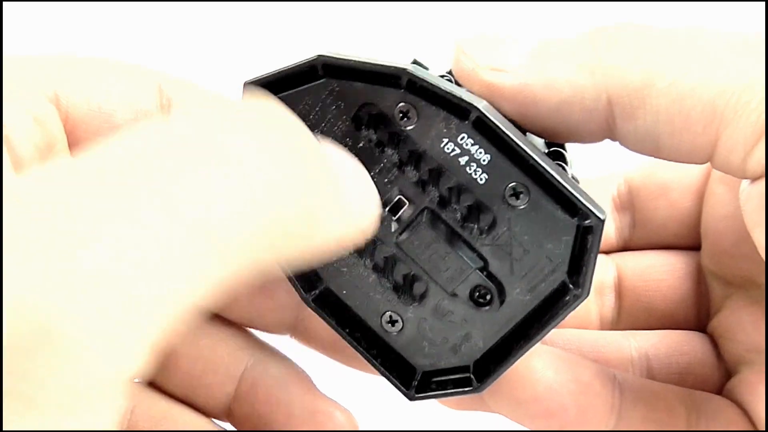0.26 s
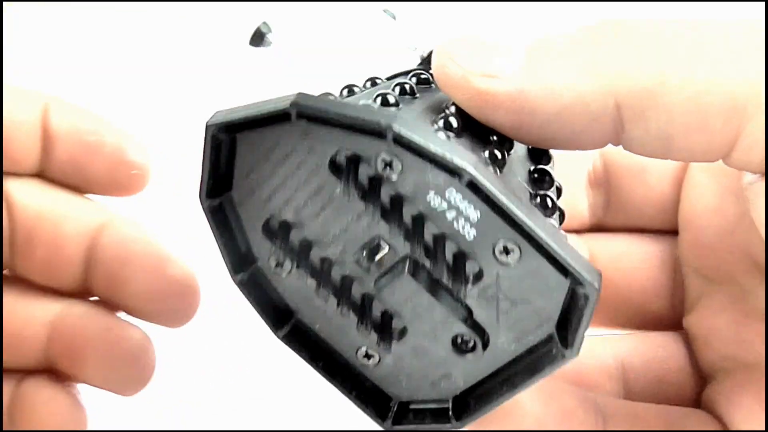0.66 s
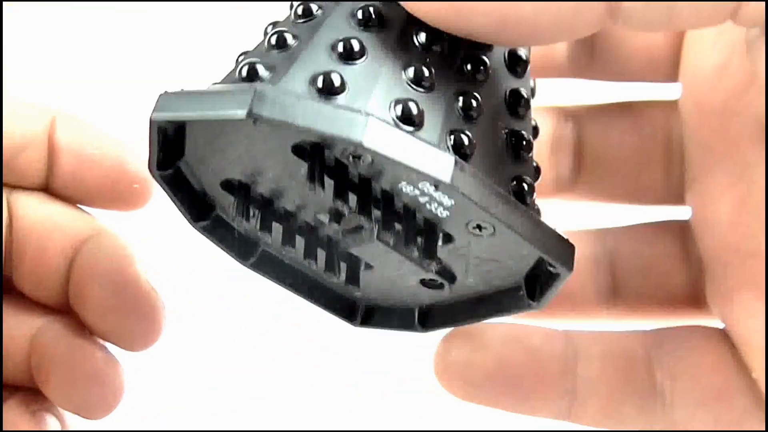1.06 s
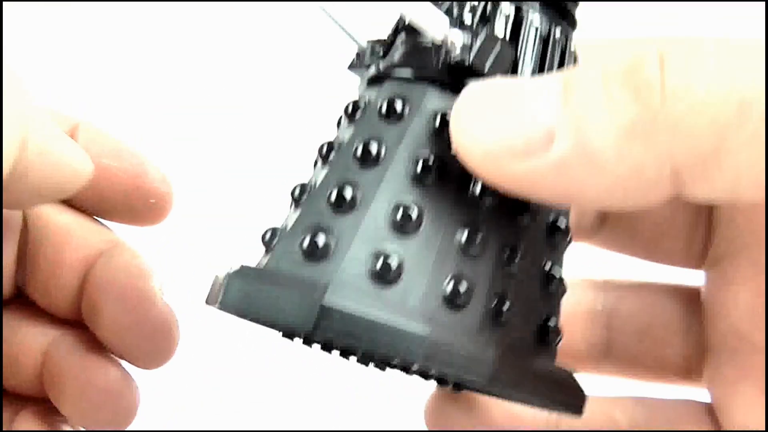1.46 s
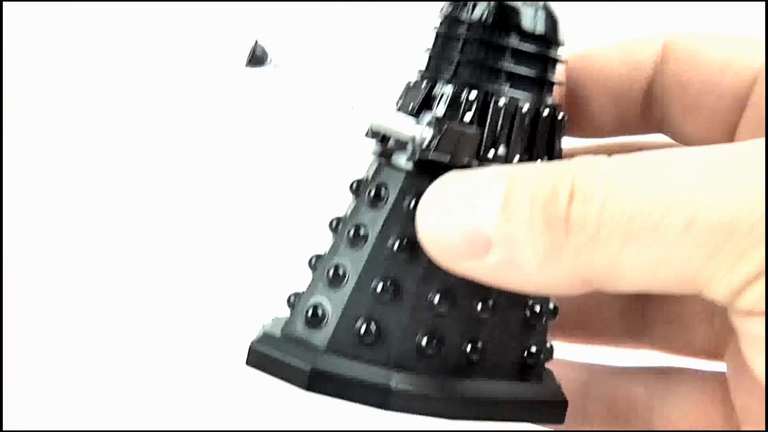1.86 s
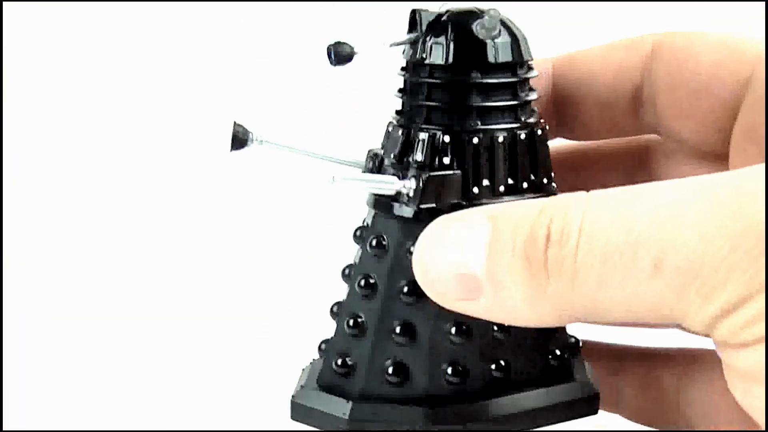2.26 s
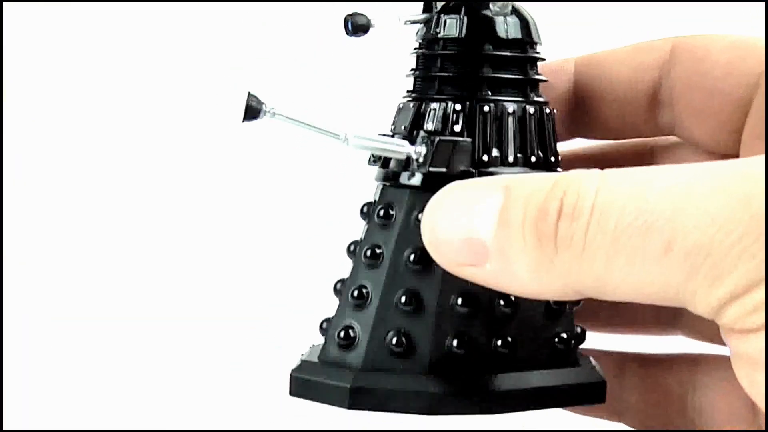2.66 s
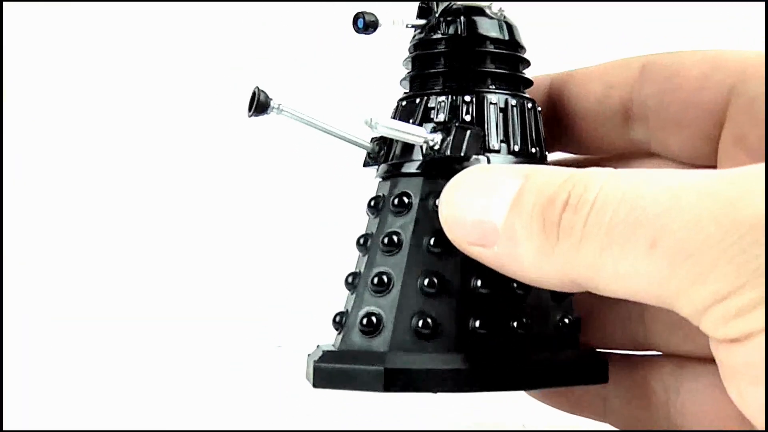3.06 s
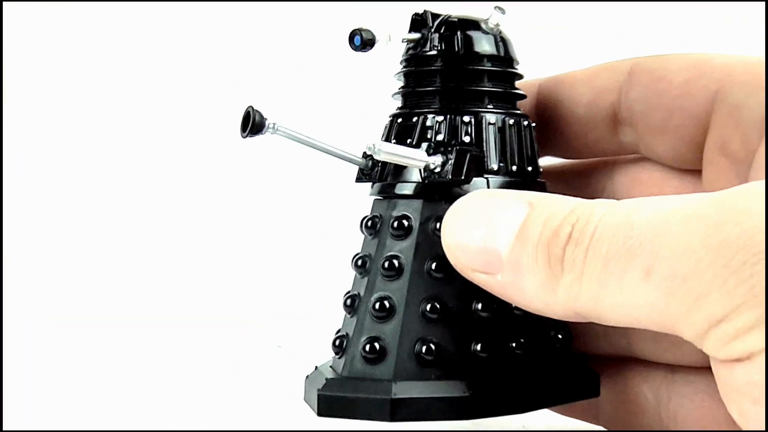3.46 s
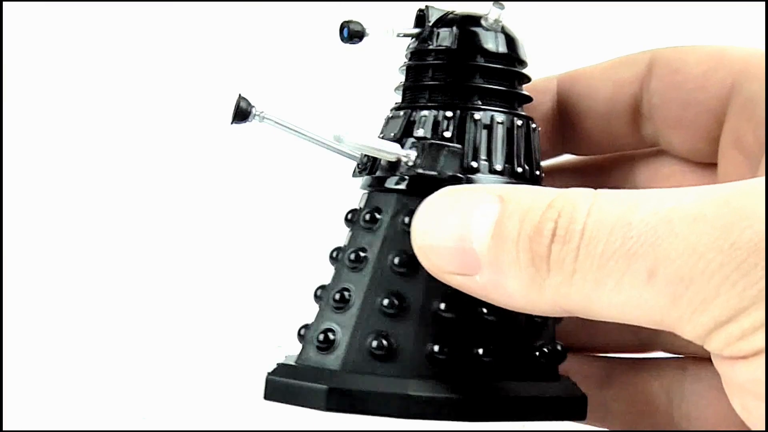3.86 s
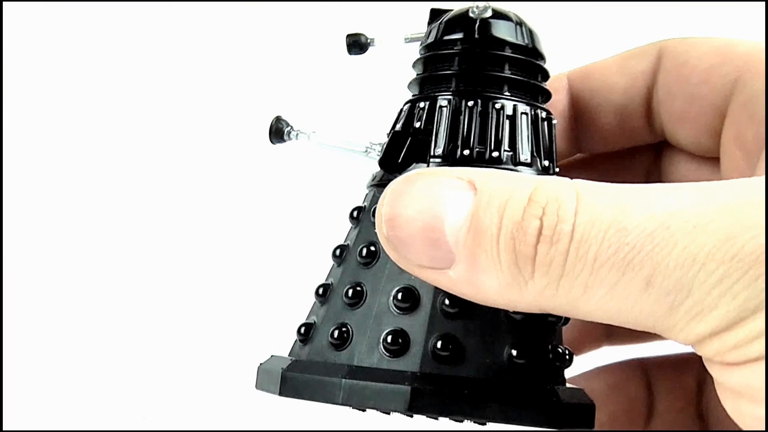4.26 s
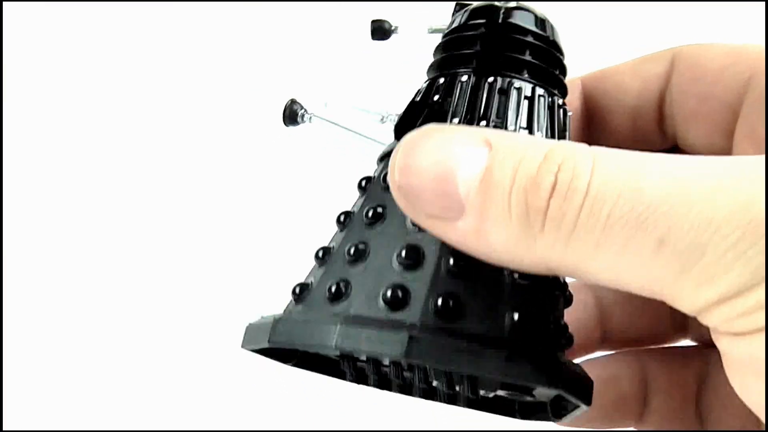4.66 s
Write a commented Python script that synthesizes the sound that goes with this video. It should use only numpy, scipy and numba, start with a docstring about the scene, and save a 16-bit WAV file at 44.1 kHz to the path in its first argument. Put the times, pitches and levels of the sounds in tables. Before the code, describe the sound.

Close to the microphone in a quiet room, the switch of a small hollow plastic toy snaps on. Its vibration motor spins up at once into a steady hum with a thin, high rattling buzz. Fingers knock and rub on the shell as the toy is turned over. The motor keeps running, its rattle shifting with the grip, under a few more soft knocks.

```python
"""In a quiet room the slide switch of a small hollow plastic bristle toy snaps, close to the microphone.
The motor spins up, and its off-centre weight drives the toy into forced vibration: it hums, and
loose parts strike a few times on every turn, exciting resonances of the shell and the motor's metal.
The toy is then turned over in the hand. Fingers rub and knock on the shell and damp its ringing;
the rubbing ends, and the motor runs on under a few more knocks."""
import sys
import numpy as np
from scipy import signal
from scipy.fft import rfft, irfft
from scipy.io import wavfile
from scipy.ndimage import uniform_filter1d
from numba import njit

SR = 44100
rng = np.random.default_rng(int(sys.argv[2]) if len(sys.argv) > 2 else 0)


def transcribe(u):
    """Save the signal u as a 16-bit wav file named by the first command-line argument.

    u: samples, shape (n,) or (channels, n), limited to [-1, 1]; the rate is SR.
    q: integer samples, one column per channel.
    """
    v = np.clip(np.atleast_2d(u).T, -1, 1)
    q = np.round(v * 32767).astype(np.int16)
    wavfile.write(sys.argv[1], SR, q)


N = 212032

# Noise spectra. Each row: frequency in Hz, relative spectral density in dB.
ROOM_SPECTRUM = [(25, 2), (60, -22), (100, -1), (200, -3.5), (430, 0.5), (600, -3), (900, -5), (1200, -9),
                 (2100, -16.5), (2600, -19), (14000, -24), (16000, -64)]
RUB_SPECTRUM = [(60, -70), (120, 0.5), (300, 0), (550, -0.5), (800, -7), (1300, -58), (3000, -54)]
SWISH_SPECTRUM = [(300, -7), (700, 4.5), (1500, 1.5), (2200, -3), (3200, -16.5), (6000, -12), (16000, -47)]
SKIN_HISS_SPECTRUM = [(1500, -9), (3200, -5.5), (5000, 7.5), (9000, -4), (12000, -12), (16000, -24)]
MOTOR_HISS_SPECTRUM = [(40, -19), (100, 8), (260, -1.5), (450, 0.5), (850, -15.5), (1700, -9), (3400, -7),
                       (5000, -2.5), (7000, -6.5), (10000, -16.5), (15000, -7)]

# Finger strokes. Each row: start and length in seconds, relative levels of rub and swish in dB.
STROKES = [(0.845, 0.11, -43, -56.5), (0.974, 0.11, -45, -54), (1.129, 0.11, -47, -59.5),
           (1.463, 0.042, -45, -66), (1.516, 0.075, -44, -59.5), (1.679, .11, -59, -58),
           (1.781, 0.063, -50, -59.5), (2.208, 0.082, -56.5, -60)]
# Finger knocks. Each row: start in seconds, peak level in dB before the room, body pitch in Hz.
KNOCKS = [(0.8343, -15.5, 293), (1.068, -30, 111), (1.085, -34, 99), (1.106, -33, 110), (1.978, -28.5, 196),
          (2.0, -34.5, 200), (2.04, -34.5, 183), (2.66, -34, 163), (2.692, -35.5, 138), (2.717, -37.5, 150),
          (2.776, -38, 150), (2.815, -35.5, 159), (2.858, -32.5, 165), (2.914, -36, 148),
          (2.978, -36.5, 158), (3.052, -32.5, 155), (3.2334, -25, 152), (4.7923, -17.5, 147)]
# The switch snaps over and rebounds. Each row: start in seconds, relative level in dB.
SWITCH_SNAPS = [(0.1531, -17), (0.1565, -0.5), (0.157, 6), (0.1613, -20), (0.1623, -14)]
# Modes it excites. Each row: frequency in Hz, relative level in dB, time to fall 60 dB in seconds.
SWITCH_MODES = [(225, -40, .03), (400, -16, 0.0076), (720, -27.5, 0.01), (1280, -39, 0.0066),
                (1717, -34, 0.024), (2270, -36, 0.0093), (3240, -36, .008), (4070, -26, 0.018),
                (4960, -21.5, 0.018), (5460, -23.5, 0.016), (5980, -22, 0.022), (7260, -25, 0.02),
                (7870, -33, .025), (8520, -29, 0.035), (11000, -19, 0.0039), (13700, -36, 0.0038)]

# Running speed, which sags under a firmer grip. Each row: time in seconds, turns per second once spun up.
RUNNING_SPEED = [(.42, 173.7), (.54, 177.6), (.7, 178.3), (.95, 176.6), (1.55, 175.8), (1.65, 174.8),
                 (1.9, 174.4), (2.25, 175.3), (2.55, 175.4), (2.82, 176.4), (3.02, 174.6), (3.3, 172.9),
                 (3.73, 172.1), (4.18, 175.1), (4.42, 173.4), (4.81, 172.6)]
# How the toy is held. Each row: time in seconds, contact scrape from 0 to 1, gain of the buzz in dB.
GRIP = [(0.17, .95, -8), (0.42, 0, -1), (0.56, .05, -8), (0.8, 0, -4), (1.1, 0.52, -5.5), (1.6, 0.37, -0.5),
        (2.1, 0.38, 5), (3.9, 0.12, 4), (4.15, 0.3, -1), (4.81, 0.1, -1.5)]
# Swing of the whole toy. Each row: time in seconds, level of the hum in dB.
HUM_LEVEL = [(0.17, -55), (0.21, -47), (0.28, -48.5), (0.33, -42.5), (0.5, -40), (0.9, -38), (1.15, -37.5),
             (1.6, -38.5), (2.1, -40), (2.4, -41), (3.1, -41.5), (3.5, -40), (4.81, -40.5)]
# Partials of the hum and of the frame's buzz. Each row: multiple of the speed, relative level in dB.
HUM_PARTIALS = [(1, 0), (2, -36), (3, -26.5), (4, -32.5), (5, -38.5)]
BUZZ_PARTIALS = [(6, -32), (7, -28.5), (8, -30.5), (9, -33), (10, -31.5), (11, -43), (12, -40), (13, -47),
                 (14, -36.5), (16, -32), (17, -26.5), (18, -38.5), (19, -38.5), (20, -34), (21, -44),
                 (22, -37), (23, -44), (24, -46), (25, -37.5), (26, -38)]
# The motor's whine and a faint, high metal ring. Each row: time in seconds, level in dB.
WHINE_LEVEL = [(0.19, -72), (0.38, -78), (0.41, -69), (0.67, -62.5), (1.27, -59.5), (1.33, -68.5),
               (1.95, -56.5), (2.01, -67), (2.1, -59.5), (2.3, -67), (3.02, -62), (3.07, -58.5),
               (4.72, -60.5), (4.76, -59)]
FAINT_RING_LEVEL = [(0.19, -62), (0.24, -53), (0.39, -64), (0.51, -54.5), (1.08, -55), (1.26, -65),
                    (1.49, -59), (1.91, -63), (1.95, -57), (2.9, -53.5), (3.19, -69), (3.78, -62),
                    (4.1, -54.5), (4.49, -63), (4.76, -62)]

# Impacts within one turn. Each row: position as a fraction of the turn, relative force in dB.
RATTLE_CONTACTS = [(0.222, -5.5), (0.442, -1.5), (0.626, -8.5), (0.858, -1)]
ZING_CONTACTS = [(0.11, -3.5), (0.268, -5), (0.602, -1.5)]
# Resonances. Each row: frequency in Hz, bandwidth in Hz, gain in dB.
TRIM_MODES = [(8100, 1240, -2.5), (8520, 120, 10), (9470, 1600, -3), (12200, 690, -6), (16000, 2700, -5.5)]
BASE_MODES = [(2880, 450, -9.5), (3710, 180, 1.5), (3720, 226, -2), (4500, 370, -4)]
ZING_MODES = [(13500, 320, -1), (13960, 260, 0), (14380, 380, -6)]
FAINT_RING_MODES = [(11230, 150, 0), (11420, 170, -2)]
SHELL_MODE_GROUPS = [
    [(5160, 107, -4), (5434, 140, 0), (5604, 167, -3)],
    [(5957, 99, -5.5), (6120, 140, -6), (6196, 100, -10)],
    [(6387, 164, 4.5), (6662, 160, -0.5), (7050, 98, -0.5)],
]  # three lists of such rows: low, middle and high
# The fingers damp each group differently. Each row: time in seconds, relative level in dB.
LOW_RING_LEVEL = [(0.19, -64), (0.29, -52), (0.88, -59), (1.11, -45.5), (1.37, -44.5), (1.54, -52),
                  (1.98, -48.5), (2.39, -57.5), (2.91, -51), (3.8, -54.5), (4.14, -43), (4.81, -44)]
MIDDLE_RING_LEVEL = [(0.19, -46), (0.32, -40), (0.52, -48), (0.72, -40), (0.81, -44.5), (1.13, -48),
                     (1.41, -42), (1.95, -46), (2.36, -59), (2.7, -54), (2.82, -47), (3.49, -57),
                     (3.66, -51.5), (3.96, -58), (4.1, -46), (4.81, -47.5)]
HIGH_RING_LEVEL = [(0.19, -52), (0.25, -45.5), (1.0, -48), (1.47, -44), (2.13, -59.5), (2.22, -53.5),
                   (2.84, -59.5), (2.89, -53.5), (3.78, -49), (4.01, -55.5), (4.32, -49.5), (4.81, -49.5)]
# Thin zing of the motor's metal. Each row: time in seconds, relative level in dB, centre in Hz.
ZING_CURVE = [(0.18, -51, 14100), (0.45, -37.5, 13900), (0.5, -50, 14100), (0.66, -41.5, 14300),
              (0.84, -50, 13600), (1.05, -45, 13700), (1.15, -50.5, 13500), (1.29, -42, 14300),
              (1.74, -48, 14100), (1.99, -40, 13400), (2.39, -44, 13900), (2.68, -43.5, 14100),
              (3.02, -48, 14100), (3.51, -41.5, 13400), (3.62, -44.5, 13500), (3.96, -41, 13500),
              (4.29, -46, 14200), (4.76, -42, 13950)]
# The turning toy beams the zing to one side. Each row: time in seconds, left minus right in dB.
ZING_SIDE = [(0.19, 4.0), (0.39, 4.0), (0.9, -1), (1.0, 4.5), (1.82, 1.5), (2.81, 3.0), (3.08, -1),
             (3.21, 1.5), (4.81, 4)]
# Loose parts shake most while the toy is turned over.
# Each row: time in seconds, relative levels of the trim's sizzle and the base's rasp in dB.
LOOSENESS = [(0.19, -51.5, -53.5), (0.35, -53, -75.5), (0.41, -54, -60), (0.52, -47.5, -59),
             (0.6, -51.5, -56.5), (0.72, -47.5, -57), (0.86, -46.5, -52), (1.33, -50.5, -49),
             (2.11, -55.5, -63.5), (2.43, -59, -74.5), (3.04, -57, -81), (3.41, -61, -60),
             (3.87, -57.5, -70), (4.0, -55, -57), (4.12, -61, -71), (4.76, -60, -61)]

MOTOR_START_S = .16
TIME = np.arange(N) / SR


def from_db(db):
    """Amplitude grows tenfold for every 20 dB."""
    return 10 ** (np.asarray(db) / 20)


def unit_rms(x):
    """Normalisation to an rms of 1."""
    return x / np.sqrt(np.mean(x ** 2) + 1e-20)


def steady(x):
    """Division by the running rms flattens the envelope."""
    power = uniform_filter1d(np.mean(np.atleast_2d(x) ** 2, axis=0), 2500)
    return x / np.sqrt(np.maximum(power, 1e-4 * np.mean(x ** 2)))


def curves(rows):
    """Linear interpolation gives each column after the time a value at every sample."""
    times, *columns = np.transpose(rows)
    return [np.interp(TIME, times, column) for column in columns]


def drift(corner_hz):
    """Low-passed noise is a slow random fluctuation, here of rms 1."""
    hz = np.fft.rfftfreq(N, 1 / SR)
    return unit_rms(irfft(rfft(rng.standard_normal(N)) / (1 + (hz / corner_hz) ** 2), N))


def pan(x, left_db):
    """A level difference between the channels gives direction."""
    return x * from_db(np.array([[.5], [-.5]]) * left_db)


def highpass(x, hz):
    """A second-order filter falls 12 dB per octave below its corner."""
    return signal.sosfilt(signal.butter(2, hz, "high", fs=SR, output="sos"), x)


def noise(spectrum, side_db):
    """Spectral shaping colours noise of rms 1; an independent side signal gives it width."""
    hz, db = np.transpose(spectrum)
    gain = from_db(np.interp(np.log(np.fft.rfftfreq(N, 1 / SR) + 1), np.log(hz), db))
    mid, side = irfft(rfft(rng.standard_normal((2, N))) * gain, N)
    return unit_rms(mid + from_db(side_db) * side * [[1], [-1]])


def resonate(x, modes):
    """Modal superposition: damped resonators respond in parallel, with alternating sign."""
    out = 0
    for k, (hz, width_hz, db) in enumerate(modes):
        r = np.exp(-np.pi * width_hz / SR)
        feedback = [1, -2 * r * np.cos(2 * np.pi * hz / SR), r * r]
        response = (1 - r * r) / 2 * signal.lfilter([1, 0, -1], feedback, x + 1e-18)
        out = out + (-1) ** k * from_db(db) * response
    return out


@njit
def moving_resonance(x, hz, width_hz):
    """A two-pole resonator passes a band whose centre follows a curve."""
    angle, r = 2 * np.pi * hz / SR, np.exp(-np.pi * width_hz / SR)
    y = np.zeros(len(x))
    for i in range(2, len(x)):
        drive = (1 - r * r) / 2 * (x[i] - x[i - 2])
        y[i] = drive + 2 * r * np.cos(angle[i]) * y[i - 1] - r * r * y[i - 2]
    return y


def room(x, wet_db, t60=.2):
    """Reverberation: a small room's reflections decay exponentially, differently at each ear."""
    t = np.arange(9000) / SR
    tail = rng.standard_normal((2, len(t))) * from_db(-60 * t / t60) * (t > .002)
    tail /= np.sqrt(np.sum(tail ** 2, axis=1, keepdims=True))
    return x + from_db(wet_db) * signal.fftconvolve(x[None], tail, axes=1)[:, :N]


def room_tone():
    """The noise floor of the room is a steady, diffuse hush."""
    return from_db(-59) * noise(ROOM_SPECTRUM, side_db=1.5)


def rubbing(attack_s=.029, release_s=.049):
    """Stick-slip friction of skin on plastic: each stroke swells, holds and dies away."""
    rub_gain, swish_gain = 0, 0
    for start, length, rub_db, swish_db in STROKES:
        swell = np.clip((TIME - start) / attack_s, 0, 1)
        touch = swell * np.exp(-np.maximum(TIME - start - length, 0) / release_s)
        rub_gain = rub_gain + touch * from_db(rub_db - 1.2)
        swish_gain = swish_gain + touch * from_db(swish_db)
    slips = unit_rms(from_db(2.4 * drift(70)))
    swish = from_db(5.5) * noise(SWISH_SPECTRUM, side_db=-5)
    hiss = from_db(6.6) * noise(SKIN_HISS_SPECTRUM, side_db=-13)
    rub = noise(RUB_SPECTRUM, side_db=-19)
    return slips * (rub_gain * rub + swish_gain * (swish + hiss))


def knocks(decay_cycles=2.85, soft_touch_hz=240):
    """Each finger blow starts a damped oscillation; the skin dulls a light touch more than a hard one."""
    out, t = np.zeros(N + SR), np.arange(SR // 10) / SR
    for start, db, hz in KNOCKS:
        swing = np.cos(2 * np.pi * hz * t) * from_db(-60 * t * hz / decay_cycles)
        high_hz = soft_touch_hz + 960 * from_db(db + 10.5) ** .76
        low_hz = min(.28 * hz, high_hz / 2)  # below this the small body hardly radiates
        thud = signal.sosfilt(signal.butter(2, [low_hz, high_hz], "band", fs=SR, output="sos"), swing)
        at = int(start * SR)
        out[at:at + len(t)] += from_db(db) * thud / np.abs(thud).max()
    return pan(room(out[:N], wet_db=-14), left_db=-1.7)


def switch():
    """Impulse excitation: each snap gives a brief crack and leaves the shell's modes ringing."""
    out, t = np.zeros(N), np.arange(SR // 10) / SR
    for start, db in SWITCH_SNAPS:
        ring = sum((-1) ** k * from_db(level - 60 * t / t60) * np.sin(2 * np.pi * hz * t)
                   for k, (hz, level, t60) in enumerate(SWITCH_MODES))
        crack = from_db(-25 - 60 * t / .009) * rng.standard_normal(len(t))
        at = int(start * SR)
        out[at:at + len(t)] += from_db(db - 5) * (ring + crack)
    radiated = highpass(out + 1e-18, hz=170)  # so small a shell radiates no bass
    return pan(room(radiated, wet_db=-15), left_db=-3)


def chatter(turns, contacts, jitter_s, uneven_db, wander_turns, scrape):
    """A nearly periodic impulse train: each contact clicks once a turn, then scrapes briefly."""
    half_width, samples = 8, np.arange(N)
    out, taps = np.zeros(N + 2 * half_width), np.arange(-half_width, half_width)
    whole_turns = np.arange(1, int(turns[-1]) - 1)
    turn_starts = np.interp(whole_turns, turns, samples).astype(int)
    for fraction, db in contacts:
        at = np.interp(whole_turns + fraction + wander_turns * drift(1)[turn_starts], turns, samples)
        at = np.clip(at + jitter_s * SR * rng.standard_normal(len(at)), half_width, N - 1)
        force = from_db(db + uneven_db * rng.standard_normal(len(at)) + 2 * drift(.13)[turn_starts])
        # a windowed sinc places each click between the samples
        index = at.astype(int)[:, None] + taps
        offset = index - at[:, None]
        np.add.at(out, index, force[:, None] * np.sinc(offset) * np.sinc(offset / half_width))
    clicks = out[:N]
    fade = np.exp(-1 / (.0008 * SR))
    scrape_envelope = np.sqrt(signal.lfilter([1 - fade], [1, -fade], clicks ** 2 + 1e-18))
    return clicks + scrape * scrape_envelope * rng.standard_normal(N)


def loose_parts(turns, scrape):
    """Intermittent contact makes the trim sizzle and the base rasp against the fingers."""
    sizzle_db, rasp_db = curves(LOOSENESS)
    impacts = chatter(turns, RATTLE_CONTACTS, jitter_s=1.7e-6, uneven_db=.8,
                      wander_turns=.006, scrape=.8 * scrape)
    sizzle = from_db(sizzle_db + 1.66) * steady(room(resonate(impacts, TRIM_MODES), wet_db=-4))
    rasp = from_db(rasp_db - 2.5) * steady(resonate(impacts, BASE_MODES))
    return pan(sizzle, left_db=-2.5) + pan(rasp, left_db=-3.5)


def metal_ticks(turns, scrape):
    """Small metal parts of the motor tick and ring at their very high natural frequencies."""
    zing_db, zing_hz = curves(ZING_CURVE)
    ticks = chatter(turns, ZING_CONTACTS, jitter_s=1.1e-6, uneven_db=.35,
                    wander_turns=.003, scrape=.65 * scrape)
    zing = moving_resonance(resonate(ticks, ZING_MODES), zing_hz, width_hz=900)
    zing = from_db(zing_db + .65) * steady(room(zing, wet_db=-8))
    faint_ring = steady(room(resonate(ticks, FAINT_RING_MODES), wet_db=1.5))
    return pan(zing, curves(ZING_SIDE)[0]) + from_db(curves(FAINT_RING_LEVEL)[0]) * faint_ring


def shell_rattle(turns, scrape):
    """Four impacts on every turn keep the shell's resonances excited."""
    blows = chatter(turns, RATTLE_CONTACTS, jitter_s=2.5e-6, uneven_db=.6,
                    wander_turns=.004, scrape=.85 * scrape)
    levels = LOW_RING_LEVEL, MIDDLE_RING_LEVEL, HIGH_RING_LEVEL
    rings = sum(from_db(curves(level)[0] + .5) * steady(resonate(blows, modes))
                for level, modes in zip(levels, SHELL_MODE_GROUPS))
    radiated = highpass(rings, hz=3600)  # below its resonances the shell hardly radiates
    return pan(room(radiated, wet_db=-13.5), left_db=-.5)


def harmonics(turns, partials, waver_db=1.5):
    """A harmonic series phase-locked to the turn; the overtones swell and fade slowly."""
    out = 0
    for order, db in partials:
        gain = from_db(db + (order > 1) * waver_db * drift(1))
        out = out + gain * np.sin(2 * np.pi * (order * turns + rng.random()))
    return np.sqrt(2) * out


def humming(turns, grip_db, whine_order=15):
    """Forced vibration: the weight drives a hum, the frame's buzz and a whine, over a soft hiss."""
    hum_db, = curves(HUM_LEVEL)
    hum = from_db(hum_db) * harmonics(turns, HUM_PARTIALS)
    buzz = room(from_db(hum_db + grip_db - 3.83) * harmonics(turns, BUZZ_PARTIALS), wet_db=-6)
    whine = from_db(curves(WHINE_LEVEL)[0]) * unit_rms(np.sin(2 * np.pi * whine_order * turns))
    hiss_db = -56 + .45 * (hum_db - np.median(hum_db))  # swells with the swing
    hiss = from_db(hiss_db) * noise(MOTOR_HISS_SPECTRUM, side_db=-40)
    return pan(hum, left_db=-4) + pan(buzz, left_db=-3) + pan(whine, left_db=-1.5) + hiss


def motor(spin_up_s=.058, start_fraction=.645, fade_in_s=.0047):
    """Rotating unbalance shakes the toy; the speed nears its running value exponentially."""
    running_s = np.maximum(TIME - MOTOR_START_S, 0)
    spin_up = 1 - (1 - start_fraction) * np.exp(-running_s / spin_up_s)
    turns = np.cumsum(curves(RUNNING_SPEED)[0] * spin_up) / SR
    scrape, grip_db = curves(GRIP)
    fade_in = np.minimum(running_s / fade_in_s, 1)
    return fade_in * (humming(turns, grip_db) + shell_rattle(turns, scrape)
                      + metal_ticks(turns, scrape) + loose_parts(turns, scrape))


def scene():
    """Superposition: the pressures from the toy, the hand and the room add."""
    return motor() + rubbing() + knocks() + switch() + room_tone()


def record(dry, ceiling=.33, cutoff_hz=15800):
    """Band limiting and soft saturation: the microphone sheds rumble, rounds peaks and cuts the top."""
    rounded = ceiling * np.tanh(highpass(dry, hz=34) / ceiling)
    return signal.sosfilt(signal.ellip(10, .1, 80, cutoff_hz, fs=SR, output="sos"), rounded)


dry = scene()
out = record(dry)
transcribe(out)
```